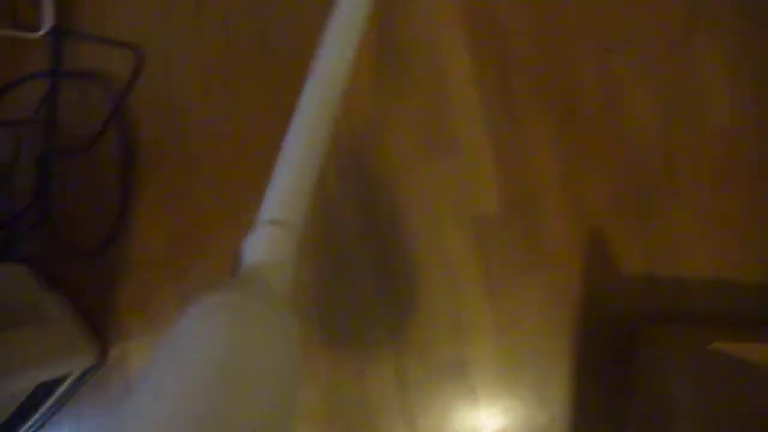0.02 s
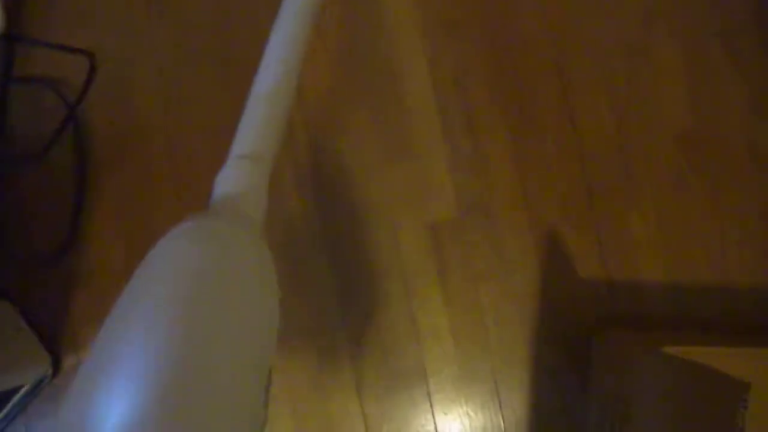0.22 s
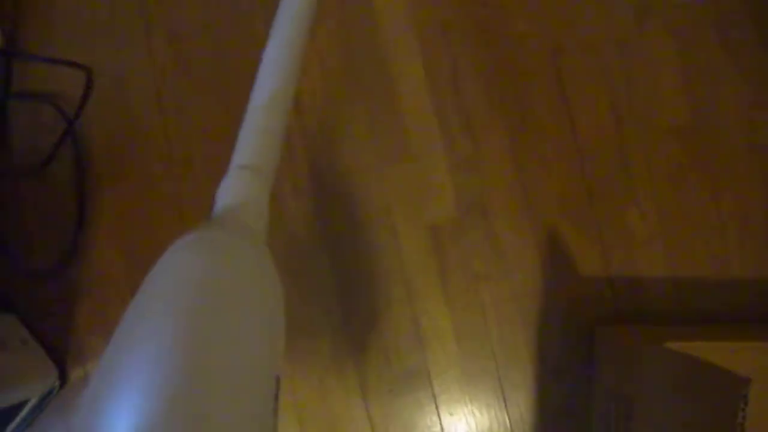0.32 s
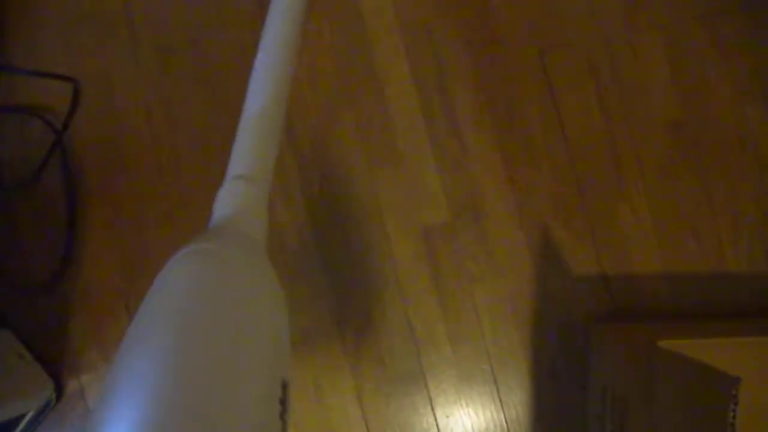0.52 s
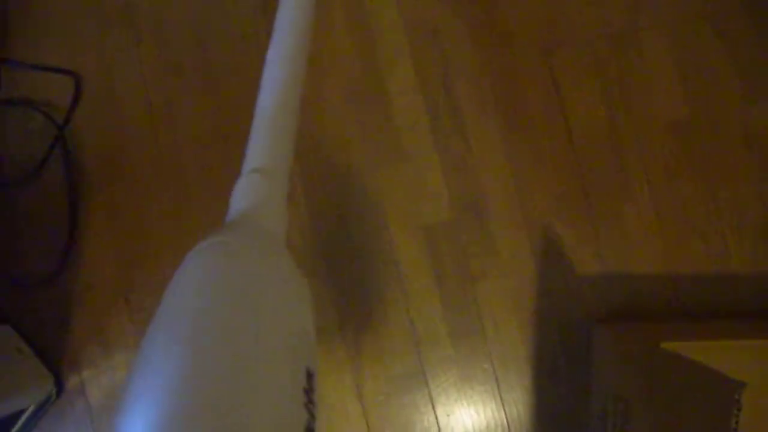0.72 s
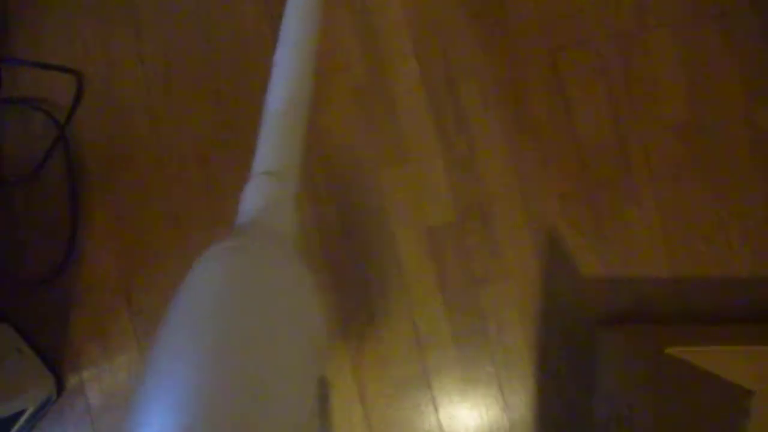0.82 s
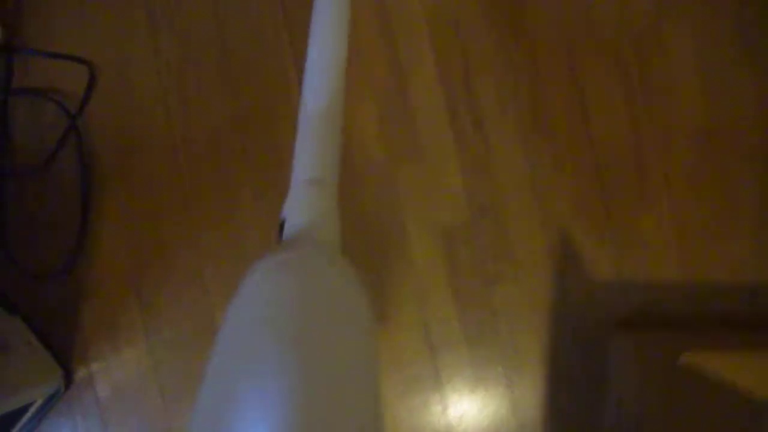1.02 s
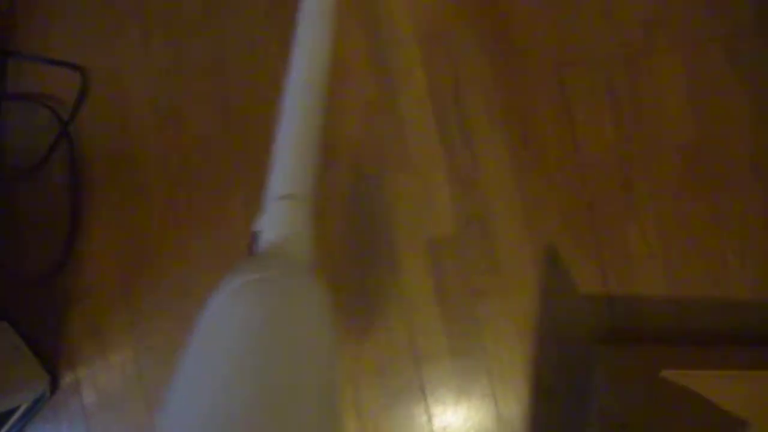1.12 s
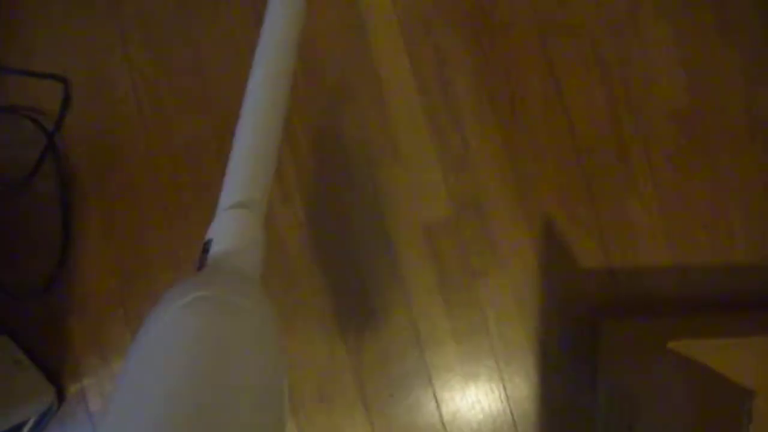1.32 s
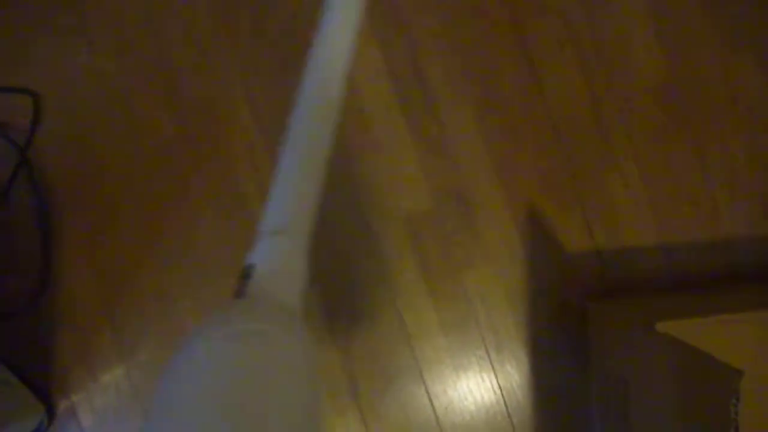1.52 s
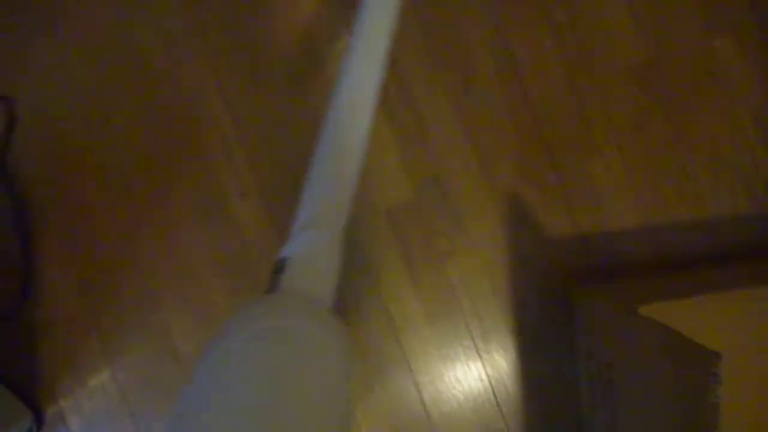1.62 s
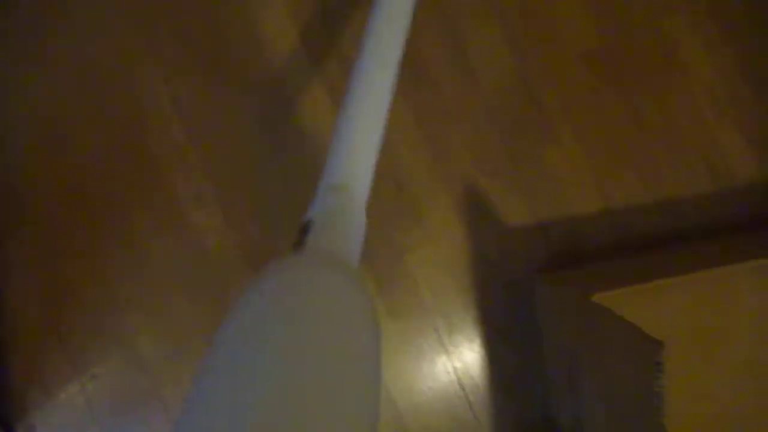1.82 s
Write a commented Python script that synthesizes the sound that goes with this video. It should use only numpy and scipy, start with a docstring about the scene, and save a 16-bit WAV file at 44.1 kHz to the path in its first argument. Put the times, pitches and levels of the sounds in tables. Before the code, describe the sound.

A cordless stick vacuum heard close in a small room: faint coasting whirr, a sharp trigger click, quick rising whine and air rush, then release, falling whirr, plastic clicks and a knock on the wooden floor.

```python
"""A cordless stick vacuum on a wooden floor in a small room, heard close up, from the handle.
First the coasting motor whirrs under a faint rush of air, then the trigger snaps: the motor spins up,
its hum and nine-blade whine rising with the rotor speed, the rush swelling as shaped noise.
Let go at about 1 s, it runs down with a rough whistle, while the floor head rolls, bumps, knocks and clicks.
Rolling and contacts are ringing noise; the knock is decaying sines."""
import sys
import numpy as np
from scipy import signal
from scipy.fft import rfft, irfft
from scipy.io import wavfile

SR = 44100
rng = np.random.default_rng(int(sys.argv[2]) if len(sys.argv) > 2 else 0)


def materialize(psi):
    """Save the field psi as 16-bit PCM at rate SR to the path in sys.argv[1].

    A 1-D psi becomes a single channel; in a 2-D psi each row is a channel.
    """
    bounded = np.clip(np.atleast_2d(psi).T, -1, 1)
    quanta = np.round(bounded * 32767).astype(np.int16)
    wavfile.write(sys.argv[1], SR, quanta)


N = 83790  # samples, 1.9 s
T = np.arange(N) / SR  # time of each sample, s


def from_db(db):
    """Decibels to gain."""
    return 10 ** (np.asarray(db) / 20)


def rms_one(x):
    """Scale to unit rms."""
    return x / np.sqrt(np.mean(x ** 2) + 1e-20)


def in_time(rows):
    """Join (t/s, value) rows by straight lines."""
    return np.interp(T, *np.transpose(rows))


def drift(rate):
    """Slow random wander with rms about 1: noise through a two-pole low-pass with its poles at rate (Hz)."""
    step = 40  # samples between coarse points
    settling = 2000  # coarse points dropped while the filter settles
    pole = np.exp(-2 * np.pi * rate * step / SR)
    coarse = rng.standard_normal(N // step + settling + 2)
    slow = signal.lfilter([1], [1, -2 * pole, pole * pole], coarse)[settling:]
    return np.interp(np.arange(N) / step, np.arange(len(slow)), rms_one(slow))


def coloured(x, colour):
    """Weight a signal's spectrum by (f/Hz, level/dB) points, joined on a log frequency axis; rms 1."""
    hz, db = np.transpose(colour)
    bins = np.maximum(np.arange(N // 2 + 1) * SR / N, 1)
    gain = from_db(np.interp(np.log(bins), np.log(hz), db))
    return rms_one(irfft(rfft(x) * gain, N))


def noise(colour):
    """Smooth noise with a given spectrum; rms 1."""
    return coloured(rng.standard_normal(N), colour)


def resonant_noise(hz, width_hz):
    """Noise in one steep-sided resonance; rms 1."""
    edge = np.exp(np.arcsinh(width_hz / hz / 2))  # band edges lie evenly about hz in ratio
    sos = signal.butter(2, [hz / edge, hz * edge], "band", fs=SR, output="sos")
    return rms_one(signal.sosfilt(sos, rng.standard_normal(N + SR))[SR:])


def blow(start, attack_s, t60):
    """Envelope of one contact: quick rise, exponential fall by 60 dB in t60 seconds."""
    age = np.maximum(T - start, 0)
    return (1 - np.exp(-age / attack_s)) * from_db(-60 * age / t60)


def tone(phase, rough, rate):
    """A partial whose strength and phase are shaken by turbulence; rms about 1."""
    steady_part = (1 + rough * drift(rate)) * np.sin(phase)
    shaken_part = rough * drift(rate) * np.cos(phase)
    return np.sqrt(2 / (1 + 2 * rough ** 2)) * (steady_part + shaken_part)


REFLECTIONS_T60_S, REFLECTIONS_DB = 0.19, -7


def reflect(x):
    """Dense reflections from shell and floor put a fine, fixed ripple on a spectrum; rms 1."""
    echoes = rng.standard_normal(N) * blow(0.00033, 0.0014, REFLECTIONS_T60_S)
    echoes = echoes / np.sqrt(np.sum(echoes ** 2))
    reflected = irfft(rfft(x) * rfft(echoes), N)
    return rms_one(x + from_db(REFLECTIONS_DB) * reflected)


# rotor speed, coasting, driven, then running down: (t/s, turns per s)
ROTOR_SPEED = [(0, 124), (.22, 112), (.26, 168), (.3, 203), (.335, 224), (.386, 242.5), (.43, 252.5),
               (.492, 262), (.55, 269), (.626, 274.9), (.736, 280.3), (.975, 281.7), (1.0, 275),
               (1.066, 261.6), (1.212, 234.9), (1.426, 199.8), (1.56, 181.6), (1.7, 166), (1.9, 149)]


def rotor_speed():
    """Turns per second of the rotor, which set the pitch of every motor tone."""
    return in_time(ROTOR_SPEED)


# dry whirr of bearings and brush: (t/s, level/dB)
WHIRR_LEVEL = [(0, -48.5), (.21, -50.5), (.27, -36), (1.0, -43), (1.25, -32.5), (1.4, -36), (1.65, -40),
               (1.9, -43.5)]
# its spectrum: (f/Hz, relative level/dB per Hz)
WHIRR_SPECTRUM = [(40, -33), (100, -28.5), (250, -13), (380, -19), (480, 3), (680, -2.5), (800, 0.5),
                  (1200, -3), (1500, 3), (1700, -2), (2350, 0.5), (2850, -5), (3900, -1), (5600, -3.5),
                  (6500, -4.5), (7200, -9.5), (7800, -8), (9500, -17), (12000, -17.5), (15500, -29)]
# bearing tones: (multiple of the rotor speed, level/dB against the whirr)
BEARING_TONES = [(4, -25.5), (9, -19), (24, -42), (55, -32), (59, -19.5), (67, -20)]
# ringing of the brush drive: (t/s, level/dB)
BRUSH_LEVEL = [(0, -53), (.1, -46.5), (.2, -51), (.3, -51), (1.2, -48), (1.5, -43.5), (1.7, -47.5),
               (1.9, -46.5)]
# its resonances: (f/Hz, width/Hz, relative level/dB)
BRUSH_RESONANCES = [(480, 55, -9.5), (807, 92, -11.5), (1500, 160, -11.5), (2230, 490, -8.5),
                    (6440, 360, -2), (9800, 2000, -12)]
SQUEAL_TOP_HZ = 10500


def bearings(phase):
    """Fine rattling grains, the ring of the brush drive and thin tones that follow the speed."""
    rattle = rng.standard_normal(N) * from_db(2.1 * drift(630))  # fast random level
    grains = reflect(coloured(rattle, WHIRR_SPECTRUM))
    squeal = sum(from_db(db) * tone(k * phase, rough=0.8, rate=29) for k, db in BEARING_TONES)
    squeal = signal.sosfilt(signal.butter(4, SQUEAL_TOP_HZ, fs=SR, output="sos"), squeal)
    whirr_gain = from_db(in_time(WHIRR_LEVEL) + 0.5 * drift(36))
    brush = sum(from_db(db) * resonant_noise(hz, width) for hz, width, db in BRUSH_RESONANCES)
    return whirr_gain * (grains + squeal) + from_db(in_time(BRUSH_LEVEL)) * brush


# air through the fan: (t/s, level/dB)
AIR_LEVEL = [(0, -52.5), (.22, -50), (.255, -46), (.31, -32.5), (.372, -26.5), (.5, -23.5), (.65, -21.5),
             (.994, -21), (1.08, -24.5), (1.16, -26.5), (1.23, -35.5), (1.5, -40.5), (1.9, -52.5)]
# its spectrum: (f/Hz, relative level/dB per Hz)
AIR_SPECTRUM = [(40, -38), (140, -37), (230, -8.5), (340, -16.5), (440, -9.5), (550, -16.5), (650, -15.5),
                (850, -9.5), (980, -17), (1100, -6), (1300, -16.5), (1600, -10.5), (2300, -8.5),
                (2850, -11.5), (4000, -5.5), (5300, -3), (5900, 2), (6600, -2.5), (7100, -4), (7700, -10.5),
                (9000, -11.5), (11000, -19), (15500, -26.5)]
# narrow ring of the motor under power: (t/s, level/dB)
SURGE_LEVEL = [(.22, -87), (.28, -42), (.37, -32), (.55, -46), (.95, -30.5), (1.15, -42), (1.3, -70)]
SURGE_HZ, SURGE_WIDTH_HZ = 6020, 170


def air():
    """Turbulent rush from the vents, with a narrow ring while the motor is driven."""
    rush_gain = from_db(in_time(AIR_LEVEL) + 0.43 * drift(39))
    rush = rush_gain * reflect(noise(AIR_SPECTRUM))
    ring = from_db(in_time(SURGE_LEVEL)) * resonant_noise(SURGE_HZ, SURGE_WIDTH_HZ)
    return rush + ring


# spectrum of the steady background: (f/Hz, relative level/dB per Hz)
BACKGROUND_SPECTRUM = [(20, 14), (60, 4), (120, -8.5), (500, 3), (4000, -10), (15000, -19)]
BACKGROUND_DB = -57


def background():
    """Faint steady noise, strongest in the bass, under everything."""
    return from_db(BACKGROUND_DB) * noise(BACKGROUND_SPECTRUM)


# plastic clicks: (t/s, level/dB, body against snap/dB, ring f/Hz, ring t60/s)
PLASTIC_CLICKS = [(0.112, -42.5, -20, 9260, 0.046), (0.2033, -31, -21, 5600, 0.064),
                  (.219, -20.5, -7, 6300, 0.068), (0.2254, -24, 3, 6000, 0.047),
                  (1.277, -26, -5.5, 5370, 0.026), (1.524, -33, -9, 6200, 0.073),
                  (1.619, -36, 1, 6200, 0.044), (1.743, -29.5, -16, 5670, 0.032),
                  (1.785, -28, -18, 6530, 0.013), (1.789, -32, -24, 6300, 0.023),
                  (1.797, -32, -24, 5740, 0.03)]
# bright snap: (f/Hz, relative level/dB per Hz)
SNAP_SPECTRUM = [(100, -42), (400, -4), (2500, -8), (4000, -3.5), (5200, 0), (6250, 3), (7300, -6.5),
                 (9200, -5.5), (11000, -17.5), (15500, -22)]
# duller body: (f/Hz, relative level/dB per Hz)
BODY_SPECTRUM = [(50, -31), (130, -10), (330, 15), (500, 1.5), (720, -10), (1100, 5), (1520, 1),
                 (2600, -0.5), (3900, 3), (6000, -3.5), (12000, -31)]
# modes of the plastic shell: (f/Hz, width/Hz, level/dB against the body noise)
SHELL_MODES = [(678, 79, -10.5), (868, 78, -8.5), (1530, 65, -9.5), (2026, 23, -10.5)]
CLICK_ATTACK_S, CLICK_RING_DB, CLICK_RING_WIDTH_HZ = 0.00058, 0, 1400


def clicks():
    """Trigger and joints snap in the plastic shell: short bursts of snap, body and ring."""
    snap = noise(SNAP_SPECTRUM)
    shell = sum(from_db(db) * resonant_noise(hz, width) for hz, width, db in SHELL_MODES)
    body = rms_one(noise(BODY_SPECTRUM) + shell)
    total = np.zeros(N)
    for start, db, body_db, hz, t60 in PLASTIC_CLICKS:
        ring = from_db(CLICK_RING_DB) * resonant_noise(hz, CLICK_RING_WIDTH_HZ)
        burst = snap + from_db(body_db) * body + ring
        total += from_db(db) * blow(start, CLICK_ATTACK_S, t60) * burst
    return total


ROOM_T60_S, ROOM_DB = 0.25, -4.5


def room(x):
    """The small room answers with a short diffuse tail, from about 9 ms on."""
    tail = rng.standard_normal(N) * blow(0.0091, 0.0013, ROOM_T60_S)
    tail = tail / np.sqrt(np.sum(tail ** 2))
    return from_db(ROOM_DB) * signal.fftconvolve(x, tail)[:N]


# the head bumps on the boards: (t/s, level/dB, centre f/Hz, t60/s)
BOARD_BUMPS = [(0.242, -44.5, 257, 0.15), (1.041, -47, 235, 0.14), (1.51, -32, 450, 0.12),
               (1.535, -41, 221, 0.18), (1.79, -46, 129, 0.16), (1.811, -35, 250, 0.055)]
BUMP_ATTACK_S, BUMP_WIDTH = 0.0033, 0.7  # width as a share of the centre frequency


def bumps():
    """Dull contacts of the head: broad low resonances that die away."""
    return sum(from_db(db) * blow(start, BUMP_ATTACK_S, t60) * resonant_noise(hz, BUMP_WIDTH * hz)
               for start, db, hz, t60 in BOARD_BUMPS)


# hum partials before the swell: (multiple of the rotor speed, level/dB at top speed)
HUM_PARTIALS = [(1, -46), (2, -49.5), (3, -63), (4, -50)]
# swell of the hum, strong in the spin-up and again in the run-down: (t/s, gain/dB)
HUM_GAIN = [(0, -30), (.24, -36), (.3, -4), (.4, -11), (.55, 3.5), (1.0, -4.5), (1.15, 2.5), (1.26, 0.5),
            (1.34, -4.5), (1.9, -15)]
# blade whine: (t/s, level/dB)
WHINE_LEVEL = [(0, -64), (.3, -76), (.365, -49), (.38, -31.5), (.42, -41.5), (.49, -28), (.52, -46),
               (.535, -28.5), (.62, -26), (.74, -41), (.82, -39), (.87, -34.5), (.955, -32), (.985, -39),
               (1.005, -32.5), (1.07, -27), (1.14, -42), (1.26, -44), (1.36, -60), (1.9, -63)]
# whistle at three times the blade rate, in the run-down: (t/s, level/dB)
WHISTLE_LEVEL = [(0, -77), (1.39, -55), (1.428, -40), (1.49, -48), (1.535, -57), (1.56, -43), (1.62, -57),
                 (1.675, -43), (1.74, -64)]
BLADES, WHISTLE_ORDER = 9, 27  # multiples of the rotor speed
HUM_ROUGH, WHINE_ROUGH, WHISTLE_ROUGH = 0.14, 0.14, 0.4


def rotor(speed, phase):
    """Imbalance hum whose overtones fade as the rotor slows; whine and whistle of the fan blades."""
    share = speed / speed.max()
    hum = sum(from_db(db) * share ** (k - 1) * tone(k * phase, rough=HUM_ROUGH * k, rate=17)
              for k, db in HUM_PARTIALS)
    whine = tone(BLADES * phase, rough=WHINE_ROUGH, rate=58)
    whistle = tone(WHISTLE_ORDER * phase, rough=WHISTLE_ROUGH, rate=45)
    blades = from_db(in_time(WHINE_LEVEL)) * whine + from_db(in_time(WHISTLE_LEVEL)) * whistle
    return from_db(in_time(HUM_GAIN)) * hum + blades


# ringing of the wand as the floor head rolls: (t/s, level/dB)
WAND_LEVEL = [(0, -66), (.9, -56), (1.04, -38), (1.14, -70), (1.33, -43.5), (1.62, -41), (1.74, -50),
              (1.82, -43.5), (1.9, -48)]
# resonances of the hollow wand and bin: (f/Hz, width/Hz, relative level/dB)
WAND_RESONANCES = [(228, 38, -6.5), (546.2, 13.9, -1), (776, 19, -7.5), (1480, 86, -19)]
# rumble of the wheels on the boards: (t/s, level/dB)
RUMBLE_LEVEL = [(0, -62.5), (1.3, -69), (1.42, -48), (1.6, -53.5), (1.74, -50), (1.82, -56), (1.9, -66)]
# its spectrum: (f/Hz, relative level/dB per Hz)
RUMBLE_SPECTRUM = [(30, -37), (75, -28), (115, 7), (160, 3.5), (220, -27), (300, 4), (600, -9),
                   (2000, -25.5)]


def floor_head():
    """Rolling rumbles on the boards and sets the hollow wand ringing."""
    wand = sum(from_db(db) * resonant_noise(hz, width) for hz, width, db in WAND_RESONANCES)
    rumble = noise(RUMBLE_SPECTRUM)
    return from_db(in_time(WAND_LEVEL)) * wand + from_db(in_time(RUMBLE_LEVEL)) * rumble


# modes of the floor head: (f/Hz, level/dB against the knock, t60/s)
KNOCK_MODES = [(328, -5, 0.057), (434, -2.5, 0.044), (580, -2, .06), (808, -6, 0.089)]
KNOCK_S, KNOCK_DB = 1.519, -28


def knock():
    """One hard contact rings the short modes of the floor head, neighbours in opposite directions."""
    total = np.zeros(N)
    for k, (hz, db, t60) in enumerate(KNOCK_MODES):
        mode = blow(KNOCK_S, CLICK_ATTACK_S, t60) * np.sin(2 * np.pi * hz * (T - KNOCK_S))
        total += (-1) ** k * from_db(KNOCK_DB + db) * mode
    return total


def scene():
    """All parts of the cleaner, the same in both channels; only the contacts excite the room tail."""
    speed = rotor_speed()
    phase = 2 * np.pi * np.cumsum(speed) / SR
    contacts = clicks() + bumps() + knock()
    machine = bearings(phase) + air() + rotor(speed, phase) + floor_head()
    mono = machine + background() + contacts + room(contacts)
    return np.array([mono, mono])


LOW_CUT_HZ, CUTOFF_HZ = 71, 15800
NOTCH_HZ, NOTCH_Q = 7710, 39


def record(dry):
    """The microphone thins the bass and has one narrow notch; the top is cut steeply."""
    thinned = signal.sosfilt(signal.butter(2, LOW_CUT_HZ, "high", fs=SR, output="sos"), dry)
    notched = signal.lfilter(*signal.iirnotch(NOTCH_HZ, NOTCH_Q, fs=SR), thinned)
    return signal.sosfilt(signal.ellip(12, 0.1, 80, CUTOFF_HZ, fs=SR, output="sos"), notched)


dry = scene()
out = record(dry)
materialize(out)
```